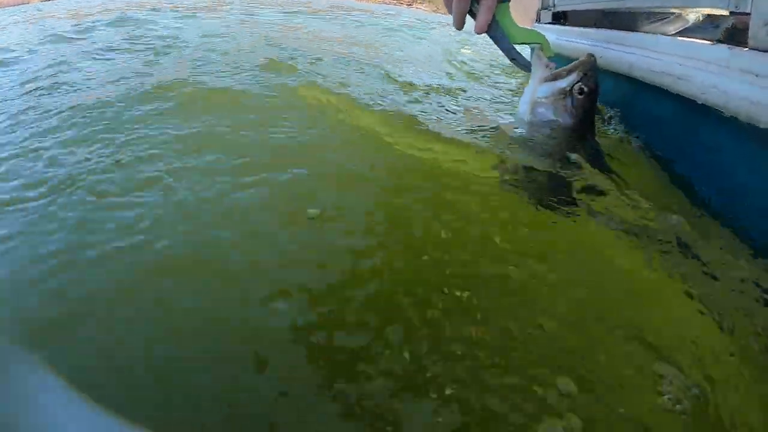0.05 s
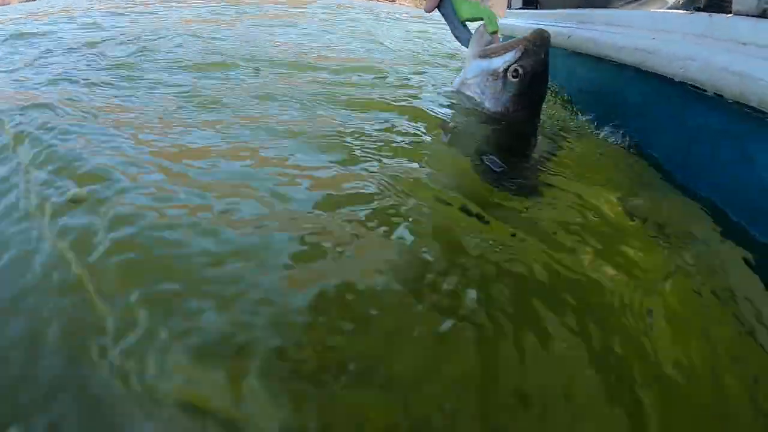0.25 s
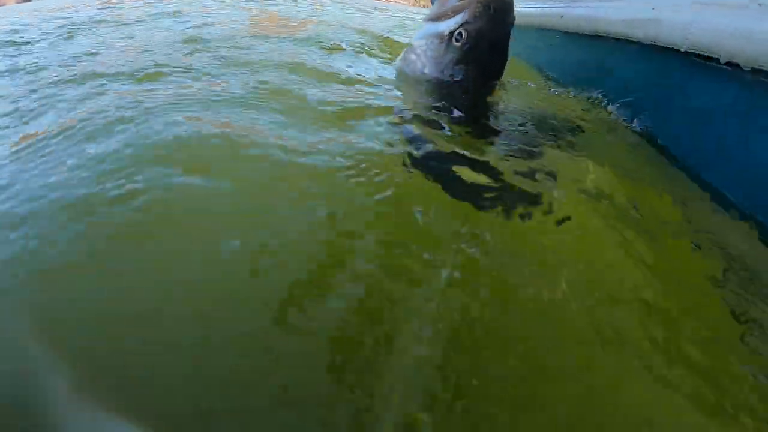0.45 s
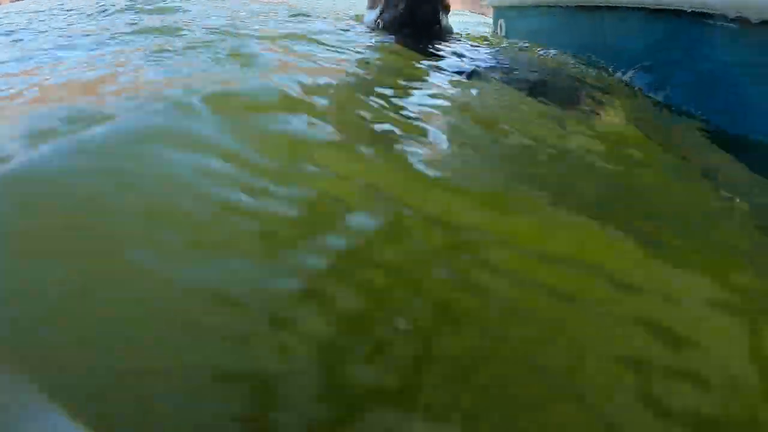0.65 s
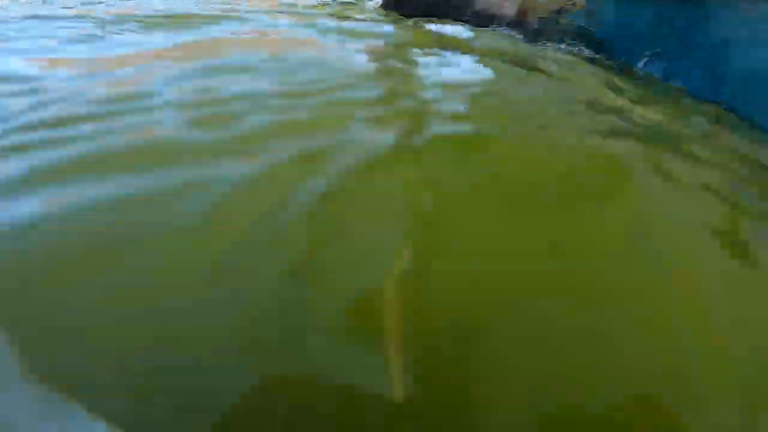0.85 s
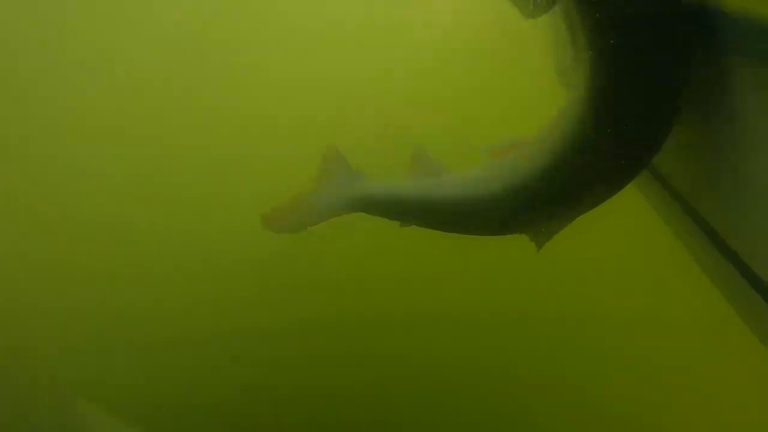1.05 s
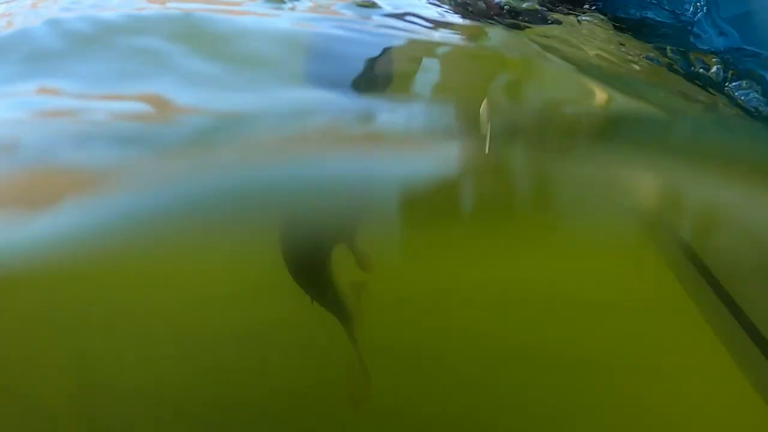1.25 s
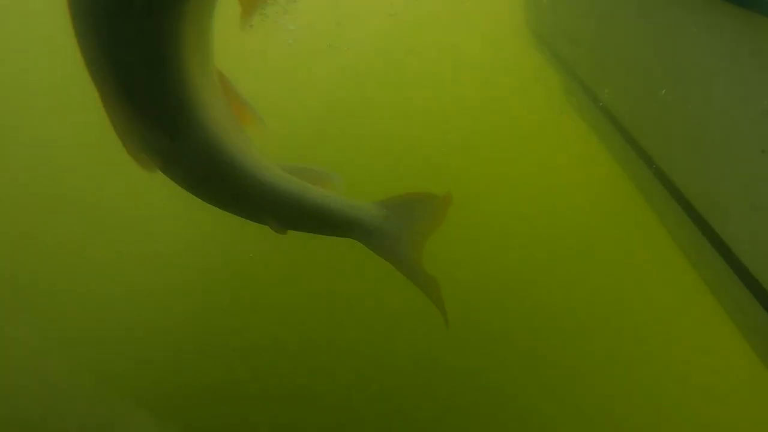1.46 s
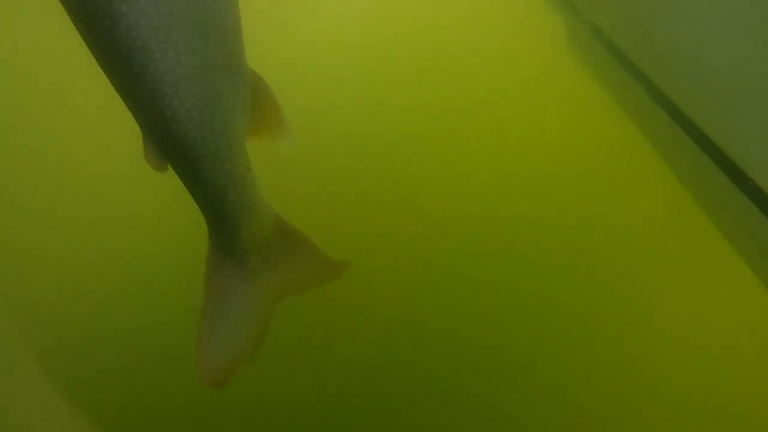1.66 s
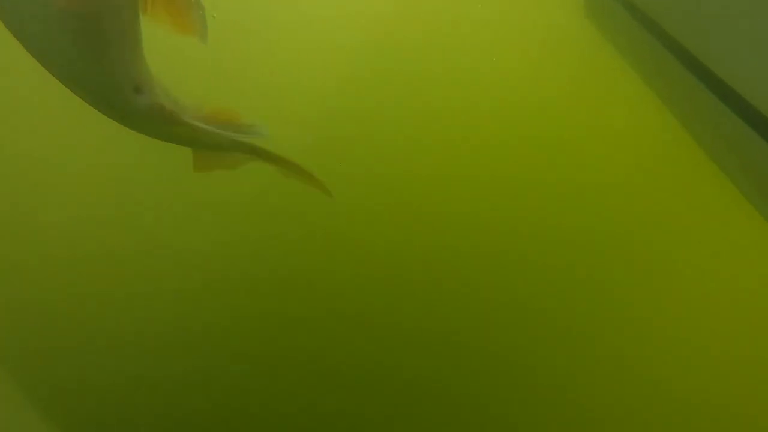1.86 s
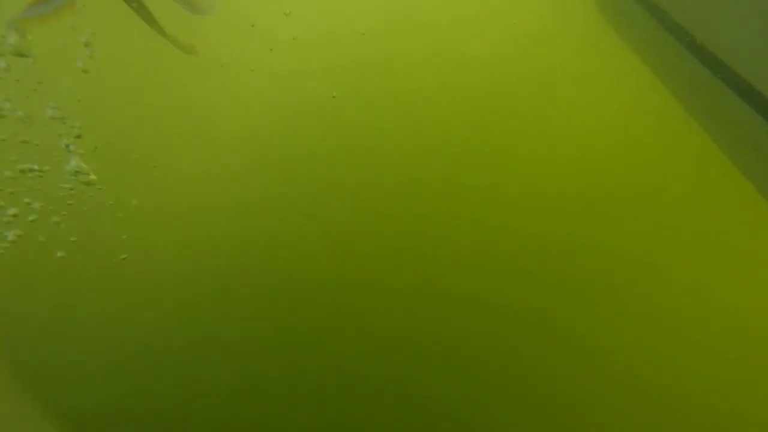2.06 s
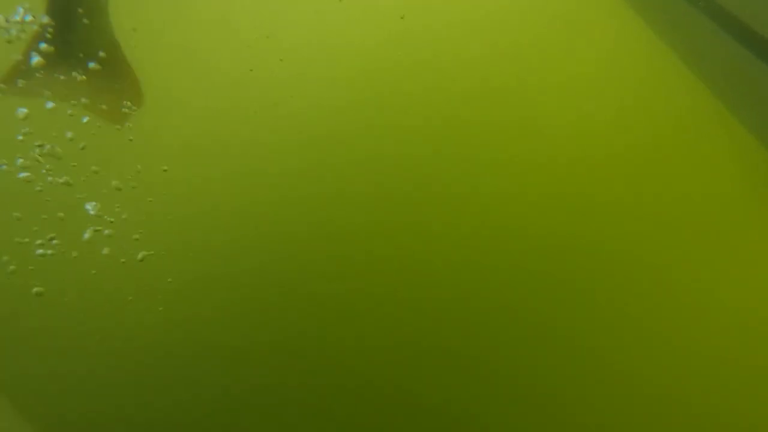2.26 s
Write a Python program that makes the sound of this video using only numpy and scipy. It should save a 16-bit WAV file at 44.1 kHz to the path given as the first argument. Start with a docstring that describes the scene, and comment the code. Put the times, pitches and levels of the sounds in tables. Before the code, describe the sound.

Water laps lightly beside a boat, with crisp drips and a sharp little splash in open air; then the microphone goes under with a plop, and everything turns to muffled rumble, thickening bubbles and gurgles.

```python
"""Stereo microphones in a housing at the waterline beside a boat hear open air, lapping, drops and a splash.
Air hiss and rumble are coloured noise, drops are short dying sines with a snap, and spray is a dense rain of clicks.
At 0.88 s the water closes over the ports: tiny bubbles fizz, a plop sounds and the air sounds stop.
Then follows a muffled churn of crowded bubbles, with single plops, gurgles, ticks of the housing and deep rumble."""
import sys
import numpy as np
from scipy import signal
from scipy.fft import rfft, irfft
from scipy.io import wavfile

SR = 44100
rng = np.random.default_rng(int(sys.argv[2]) if len(sys.argv) > 2 else 0)


def unload_wav(signal):
    """Save mono or channel-first audio to the path in sys.argv[1] as 16-bit WAV at rate SR, clipped to [-1, 1]."""
    wavfile.write(
        sys.argv[1],
        SR,
        np.round(np.clip(np.atleast_2d(signal).T, -1, 1) * 32767).astype(np.int16),
    )


def rack_gain(trim_db):
    """Turn a fader trim in dB into the linear factor to multiply a signal by."""
    fader = np.asarray(trim_db, float)
    return 10 ** (fader / 20)


N = 101959   # samples in the scene
FLOODED_ALIKE = 0.05   # correlation between the channels under water


def rms_one(x):
    """Normalisation of mean power: scale to rms 1."""
    return x / np.sqrt(np.mean(x ** 2) + 1e-20)


def in_time(rows):
    """Linear interpolation in time: each column of a curve at every sample."""
    s, *columns = np.transpose(rows)
    return [np.interp(np.arange(N) / SR, s, column) for column in columns]


def panned(pan_db):
    """Intensity stereo: gains of left and right that differ by pan_db, left over right."""
    return rack_gain(np.multiply.outer([0.5, -0.5], np.asarray(pan_db) + np.zeros(1)))


def at_hz(points, hz):
    """Spectral envelope: interpolate levels in dB on a logarithmic frequency axis."""
    point_hz, point_db = np.array(points).T
    return np.interp(np.log(hz + 1), np.log(point_hz), point_db)


def drift(rate_hz):
    """Random modulation: white noise through a double-pole low-pass, rms 1, made at SR / 40."""
    pole = np.exp(-2 * np.pi * rate_hz * 40 / SR)
    white = rng.standard_normal(N // 40 + 2002)
    slow = signal.lfilter([1], [1, -2 * pole, pole ** 2], white)[2000:]   # past the filter's start
    return np.interp(np.arange(N) / 40, np.arange(len(slow)), rms_one(slow))


def coloured(x, spectrum):
    """Filtering as spectral multiplication: shape a flat signal, then set rms 1."""
    hz = np.arange(N // 2 + 1) * SR / N
    return rms_one(irfft(rfft(x) * rack_gain(at_hz(spectrum, hz)), N))


def correlated(mid, side, alike):
    """Interchannel correlation: left and right from two independent signals, with correlation alike."""
    return np.sqrt(1 + alike) * mid + np.sqrt(1 - alike) * side * [[1], [-1]]


def noise(alike):
    """Diffuse field: stereo white noise with a set interchannel correlation."""
    mid, side = rng.standard_normal((2, N))
    return correlated(mid, side, alike)


def grains(per_s, cycles, pitches, spread_db):
    """Shot noise in resonators: random clicks, each ringing down 60 dB in some cycles, equal power per Hz."""
    sizes = rack_gain(spread_db * np.minimum(rng.exponential(1, N), 4)) * rng.choice([-1, 1], N)
    born = rng.random(N) < per_s / SR
    dealt = rng.integers(0, len(pitches), N)
    out = 0
    for k, hz in enumerate(pitches):
        radius = rack_gain(-60 * hz / (cycles * SR))
        angle = 2 * np.pi * hz / SR
        clicks = sizes * born * (dealt == k) + 1e-18   # never quite zero
        feedback = [1, -2 * radius * np.cos(angle), radius ** 2]
        out = out + hz * signal.lfilter([0, np.sin(angle)], feedback, clicks)
    return rms_one(out)


def add(out, s, sound, pan_db):
    """Superposition: mix a sound in at a time."""
    i = int(s * SR)
    out[:, i:i + len(sound)] += panned(pan_db) * sound[:N - i]


def bubble(hz, db, t60, rise, attack_s):
    """Damped oscillator: a sine swells in, decays 60 dB in t60 and rises by the share rise per second."""
    t = np.arange(int(2 * SR * max(t60, 0.002))) / SR
    decay = rack_gain(db - 60 * t / t60)
    swell = 1 - np.exp(-(t / attack_s) ** 2)
    return decay * swell * np.sin(2 * np.pi * hz * (t + rise * t * t / 2))


def above():
    """Gating by immersion: 1 while the ports are in air, 0 once they are flooded."""
    flooded_s, close_s = 0.883, 0.001
    return np.clip((flooded_s - np.arange(N) / SR) / close_s, 0, 1)


def air_hiss():
    """Broadband ambience: white noise and dense ringing grains share one spectrum and a drifting level."""
    # Treble hiss of the open air. Each row: time in seconds, central level in dB.
    hiss_levels = [(0.0, -48), (0.728, -46.5), (0.85, -49.5), (0.885, -46)]
    # Balance of the hiss. Each row: time in seconds, left-right difference in dB.
    hiss_balance = [(0, -1), (.78, 1.5), (.84, 2.5), (.885, -23.5)]
    # Spectrum of the hiss. Each row: frequency in Hz, relative density in dB per Hz.
    hiss_spectrum = [(180, 0), (300, 3.5), (450, -25.5), (890, -12), (1200, -5), (1550, -10), (2800, -12.5),
                     (4500, -19.5), (7500, -25), (9000, -35), (12000, -40.5), (15500, -48.5), (20000, -70)]
    (level_db,), (pan_db,) = in_time(hiss_levels), in_time(hiss_balance)
    ringing = grains(350, 9.6, np.geomspace(800, 14000, num=14), 1.8)
    flat = noise(0.22) + rack_gain(-9.5) * ringing
    return rack_gain(level_db + 1.0 * drift(31)) * panned(pan_db) * coloured(flat, hiss_spectrum)


def rumble():
    """Low-frequency pressure fluctuation: water pushes on the housing, heard as coloured noise."""
    # Push of the water in air. Each row: time in seconds, central level in dB.
    air_levels = [(0.0, -24.5), (0.094, -40), (0.372, -46), (0.392, -40), (0.516, -44.5), (0.9, -30.5)]
    # Spectrum of that push. Each row: frequency in Hz, relative density in dB per Hz.
    air_spectrum = [(10, -1.5), (22, -6.5), (45, 1), (90, -2.5), (133, -5.5), (200, -12.5), (400, -46.5),
                    (1200, -130)]
    # The same under water. Each row: time in seconds, level in dB before a lift of 3 dB.
    deep_levels = [(0.9, -26), (0.946, -57), (0.986, -57), (1.056, -27), (1.088, -37), (1.146, -25),
                   (1.366, -37), (1.496, -22), (1.524, -29), (1.76, -26), (2.262, -27), (2.31, -22)]
    # Spectrum under water. Each row: frequency in Hz, relative density in dB per Hz.
    deep_spectrum = [(10, -14), (22, 0), (45, 0), (90, -4), (125, -8), (180, -30), (400, -70), (1200, -130)]
    # Balance of the rumble. Each row: time in seconds, left-right difference in dB.
    rumble_balance = [(0, 3.5), (.55, 8), (.75, 1), (.85, -8), (.99, -32.5), (1.03, -8.5), (1.1, -3),
                      (1.3, 2.5), (2.31, 5)]
    (air_db,), (deep_db,), (pan_db,) = in_time(air_levels), in_time(deep_levels), in_time(rumble_balance)
    wet = np.clip((np.arange(N) / SR - deep_levels[0][0]) / 0.022, 0, 1)   # crossfade over 22 ms
    air = rack_gain(air_db + 2.5 * drift(30)) * (1 - wet) * coloured(noise(0.54), air_spectrum)
    deep = rack_gain(deep_db + 3) * wet * coloured(noise(FLOODED_ALIKE), deep_spectrum)
    return panned(pan_db) * (air + deep)


def crowd(per_s):
    """Superposed damped oscillators: random bubbles glide up 18 percent over t60, equal power per Hz."""
    out = np.zeros((2, N))
    for when, pitch, size, life in rng.random((2000, 4))[:int(per_s * N / SR)]:
        hz = 300 + 1380 * pitch
        cycles = 24.6 * (1.2 + 2.41 * life)   # to fall 60 dB
        t60 = cycles / hz
        db = -3.5 * np.log(size + 0.08) + 10 * np.log10(hz / cycles)
        add(out, when * N / SR, bubble(hz, db, t60, 0.18 / t60, 0.84 / hz), 0)
    return rms_one(out[0])


def churn():
    """Bubble cloud: crowds of oscillators on noise, as lapping above and as churn through the flooded housing."""
    # Lapping above and churn below the surface. Each row: time in seconds, central level below 900 Hz
    # in dB, central level above 900 Hz in dB.
    churn_levels = [(0, -54, -41.5), (.1, -50.5, -60.5), (.32, -50, -91), (.45, -44.5, -67),
                    (.6, -48.5, -59.5), (.73, -44, -50), (.82, -57, -57.5), (.875, -27, -40.5),
                    (.91, -49.5, -93), (.95, -61, -60), (1.03, -42.5, -71), (1.07, -38.5, -47),
                    (1.11, -31.5, -50), (1.22, -27, -56.5), (1.28, -33, -57), (1.33, -43.5, -41),
                    (1.39, -37.5, -47.5), (1.45, -31, -37.5), (1.6, -30, -40), (1.68, -25, -37.5),
                    (1.73, -24.5, -49.5), (1.85, -21.5, -39), (1.95, -28.5, -27.5), (2.01, -26, -36.5),
                    (2.1, -21, -38.5), (2.17, -21, -35), (2.21, -23.5, -36), (2.25, -21, -34.5),
                    (2.31, -31, -40)]
    # Spectrum of the churn. Each row: frequency in Hz, relative density in dB per Hz.
    churn_spectrum = [(76, -37.5), (130, 7), (167, 1), (278, -2.5), (426, -3.5), (891, -8), (1070, -14.5),
                      (1320, -14), (1510, -14.5), (1800, -56), (2340, -89), (3960, -120)]
    # The left port dips first and clears later. Each row: time in seconds, left-right dB below 900 Hz.
    churn_balance = [(0, 1.5), (.8, 1.5), (.85, -18.5), (.99, -30), (1.03, -0.5), (1.09, -9.5), (1.13, 2),
                     (1.3, -13), (1.36, 2), (2.31, 1)]
    left_dips_s = 0.83
    (low_db, high_db), (pan_db,) = in_time(churn_levels), in_time(churn_balance)
    bubbles_per_s = 260
    crowds = np.array([crowd(bubbles_per_s), crowd(bubbles_per_s)])
    shared, apart = coloured(crowds + rack_gain(11) * rng.standard_normal((2, N)), churn_spectrum)
    alike = np.where(np.arange(N) < left_dips_s * SR, 0.94, FLOODED_ALIKE)
    mix = correlated(shared, apart, alike)
    low = signal.sosfiltfilt(signal.butter(2, 900, fs=SR, output="sos"), mix)
    high = mix - low
    low_part = rack_gain(low_db + 2.0 * drift(21)) * panned(pan_db) * rms_one(low)
    return low_part + rack_gain(high_db + 2.0 * drift(15)) * rms_one(high)


def trickle():
    """Sparse shot noise: droplets tick left and right through resonators and a low-pass."""
    pitches = np.geomspace(1800, 7500, num=14)
    middle, left, right = [grains(160, 12, pitches, 3) for k in range(3)]
    dull = signal.butter(4, 7000, fs=SR, output="sos")
    return rack_gain(-64.5) * signal.sosfilt(dull, middle + np.array([left, right]))


def gurgles():
    """Frequency modulation: large air pockets sound as long sines of gliding, trembling pitch."""
    # Gurgles of large air pockets, the first, at the hull and in the deep. Each row of the three:
    # time in seconds, central frequency in Hz, central level in dB.
    first_gurgle = [(0.0, 831, -37), (0.035, 1276, -45), (0.05, 1890, -50)]
    hull_gurgle = [(0.664, 188, -36), (0.668, 203, -25), (0.705, 183.5, -33), (0.781, 206, -39.5)]
    deep_gurgle = [(1.761, 274.5, -19.5), (1.8, 313.5, -22.5), (1.824, 336.5, -23.5), (1.845, 354.7, -16),
                   (1.88, 342, -20)]
    # Place of each gurgle: left-right difference in dB.
    gurgle_pans = [-1, -3.5, -3.5]
    out = np.zeros((2, N))
    t = np.arange(N) / SR
    for rows, pan_db in zip([first_gurgle, hull_gurgle, deep_gurgle], gurgle_pans):
        hz, db = in_time(rows)
        edge = np.clip(np.minimum(t - rows[0][0], rows[-1][0] - t) / 0.0016, 0, 1)   # ramps of 1.6 ms
        phase = 2 * np.pi * np.cumsum(hz * (1 + 0.045 * drift(50))) / SR
        tone = np.sqrt(2) * np.sin(phase)   # rms 1
        out += panned(pan_db) * edge * rack_gain(db + 2.5 * drift(50)) * tone
    return out


def drops():
    """Impact and resonance: each drop is a dying sine of rising pitch with a short noise snap."""
    # Drops and small bubbles at the surface. Each row: start in seconds, level in dB before decay and
    # swell, initial frequency in Hz, left-right difference in dB, t60 in seconds.
    drop_list = [(0.0706, -42.5, 4770, -1, 0.0056), (0.0771, -31, 5400, 0, 0.0026),
                 (0.327, -38, 2670, -1, 0.017), (0.3838, -35, 3640, 0.5, 0.014),
                 (0.4044, -14.5, 7140, -4, 0.0043), (0.411, -33.5, 3280, 6.5, 0.011),
                 (0.4365, -16, 3180, 6, 0.003), (0.4426, -26.5, 3340, -2.5, 0.029),
                 (0.4467, -23, 3820, 5.5, 0.0096), (0.459, -30.5, 4060, 5.5, 0.011),
                 (0.4888, -41.5, 3380, 10, 0.01), (0.5082, -33, 4900, 0.5, 0.006),
                 (0.526, -30.5, 3980, -3, 0.0032), (0.5936, -46.5, 4800, 1, 0.0052),
                 (0.6097, -31.5, 5080, 0.5, 0.0093), (0.64, -39.5, 7400, -5, 0.0042),
                 (0.608, -28, 3430, 7.5, 0.027), (0.628, -32.5, 4280, 6, 0.0062),
                 (0.6403, -34.5, 2630, 5, 0.023), (0.66, -36, 3720, 6.5, 0.019),
                 (0.752, -46, 7040, -2.5, 0.0077), (0.839, -28.5, 1720, -10.5, 0.022),
                 (0.8653, -28, 5410, -19.5, 0.014)]
    rise_per_s, snap_db = 11, -19   # share of the pitch; snap relative to the drop
    out = np.zeros((2, N))
    snaps = rng.standard_normal((len(drop_list), 60)) * np.exp(-np.arange(60) / 28.0)
    for (s, db, hz, pan_db, t60), snap in zip(drop_list, snaps):
        add(out, s, bubble(hz, db, t60, rise_per_s, 0.000089), pan_db)
        filtered = np.convolve(snap, [0.59, 0.5, 0, -0.5, -0.36])   # weakens the lows
        add(out, s, rack_gain(db + snap_db) * filtered, pan_db)
    return out


def plops():
    """Bubble resonance: single damped sines rise 2.5 percent in pitch over t60."""
    # Single bubbles and plops. Each row: start in seconds, level in dB before decay and swell,
    # initial frequency in Hz, t60 in seconds, left-right difference in dB.
    plop_list = [(0.325, -30, 1094, 0.034, -3), (.858, -18.5, 139.6, 0.08, -29),
                 (0.87, -21.5, 353.4, 0.082, -22), (0.88, -3.5, 551, 0.01, -29),
                 (0.879, -16, 1338, 0.0032, -23), (0.4, -20, 45, 0.094, 7.5),
                 (0.893, -25.5, 561, 0.039, -39), (1.01, -40.5, 1585, 0.015, 13),
                 (1.0523, -12.5, 842, 0.019, 4), (1.0527, -9.5, 110, 0.014, 14),
                 (1.051, -26.5, 1450, 0.0089, 7), (1.146, -9, 296, 0.026, -18),
                 (1.153, -41, 3365, 0.054, 13.5), (1.162, -24.5, 3063, 0.029, 7.5),
                 (1.255, -27, 566.6, 0.16, -18), (1.33, -20, 900, 0.013, 9),
                 (1.351, -27.5, 967, 0.094, 2.5), (1.376, -31.5, 1515, 0.033, 5.5),
                 (1.666, -14, 704, 0.039, -8), (1.6806, -7.5, 1408, 0.028, 11.5),
                 (1.691, -2.5, 201, 0.016, 9), (1.758, -12, 585, 0.041, -11.5),
                 (1.7653, -8.5, 1355, 0.027, -8), (1.7865, -14.5, 610, 0.038, -0.5),
                 (1.866, -17, 1297, 0.029, 2.5), (1.929, -14.5, 348, 0.15, 6.5),
                 (1.951, -24, 1503, 0.043, 8.5), (1.965, -13, 767, 0.06, -5), (2.021, -22, 471.6, 0.31, -9),
                 (2.064, -20.5, 476.3, 0.34, -10), (2.083, -15.5, 568, 0.095, 8.5),
                 (2.113, -16, 1333, 0.033, 18.5), (2.123, -10, 389, 0.065, 6), (2.137, -14.5, 558, 0.14, 5),
                 (2.165, -25.5, 606, 0.21, 12), (2.101, -7.5, 180, 0.068, 3), (2.193, -20, 939, 0.065, 20),
                 (2.196, -16.5, 1360, 0.029, 0), (2.221, -15, 579, 0.1, 2), (2.262, -6, 1092, 0.027, 6)]
    out = np.zeros((2, N))
    for s, db, hz, t60, pan_db in plop_list:
        attack_s = min(0.073 * t60, 0.0044)
        add(out, s, bubble(hz, db, t60, 0.025 / t60, attack_s), pan_db)
    return out


def spray():
    """Dense shot noise: clicks ring briefly, largely apart in left and right, over a bed of noise."""
    # Spray of the splashes. Each row: time in seconds, level in dB before a cut of 9 dB,
    # left-right difference in dB.
    spray_levels = [(0.37, -53, -4), (0.408, -38.5, -9.5), (0.42, -41.5, 1.5), (0.446, -16, -1.5),
                    (0.472, -42.5, -4), (0.574, -60.5, -2.5), (0.602, -68.5, -11), (0.606, -32.5, -0.5),
                    (0.684, -63, -7), (0.794, -47.5, -7.5), (0.87, -31.5, -12), (0.885, -64.5, -13)]
    # Spectrum of the spray. Each row: frequency in Hz, relative density in dB per Hz.
    spray_spectrum = [(300, -4.5), (900, -11), (1160, -8), (2050, -11), (3700, -4.5), (5100, -7),
                      (6300, -8.5), (8000, -16.5), (9500, -23.5), (12000, -36), (15500, -33.5),
                      (20000, -44.5)]
    level_db, pan_db = in_time(spray_levels)
    pitches = np.geomspace(1000, 15000, num=16)
    shared, left, right = [grains(1500, 3.5, pitches, 4.2) for k in range(3)]
    flat = shared + rack_gain(8.0) * np.array([left, right]) + rack_gain(-4) * noise(0.51)
    begun = np.arange(N) > spray_levels[0][0] * SR
    return rack_gain(level_db - 9) * begun * panned(pan_db) * coloured(flat, spray_spectrum)


def fizz():
    """Many small resonators: tiny bubbles, scattered round a sinking pitch, as water climbs over the ports."""
    # Course of the fizz. Each row: time in seconds, central frequency in Hz, central level in dB
    # before decay and swell.
    fizz_course = [(.83, 6920, -42), (.855, 5740, -36.5), (.883, 5320, -43.5)]
    per_s, spread, t60_s, pan_db = 1500, 0.026, 0.005, -17.5   # spread as a share of the pitch
    out = np.zeros((2, N))
    s, centre_hz, centre_db = np.transpose(fizz_course)
    span_s = s[-1] - s[0]
    chance = np.c_[rng.random(200), rng.standard_normal((200, 2))][:int(per_s * span_s)]
    for when, pitch, size in chance:
        at = s[0] + when * span_s
        hz = np.interp(at, s, centre_hz) * (1 + spread * pitch)
        db = np.interp(at, s, centre_db) + 3.1 * size
        add(out, at, bubble(hz, db, t60_s, 0, 0.00063), pan_db)
    return out


def seep():
    """Residual transmission: faint treble under water, from ringing grains and noise."""
    # Faint treble under water. Each row: time in seconds, central level in dB.
    seep_levels = [(.89, -78), (1.02, -72), (1.1, -67), (1.18, -57.5), (1.3, -70.5), (1.39, -69.5),
                   (1.44, -60.5), (1.7, -61.5), (1.8, -68.5), (1.95, -56), (2.06, -65.5), (2.29, -72.5)]
    # Spectrum of that treble. Each row: frequency in Hz, relative density in dB per Hz.
    seep_spectrum = [(1200, -40.5), (1700, -9), (2000, -10), (2500, -8), (2950, -9.5), (3150, -6.5),
                     (3350, -12.5), (3600, -20), (3900, -25.5), (5000, -28), (6500, -50.5), (9000, -90),
                     (20000, -120)]
    level_db, = in_time(seep_levels)
    ringing = grains(350, 35.0, np.geomspace(1800, 6500, num=14), 0.49)
    flat = ringing + rack_gain(7.0) * noise(FLOODED_ALIKE)
    return rack_gain(level_db + 1.8 * drift(25)) * (1 - above()) * coloured(flat, seep_spectrum)


def ticks():
    """Modal excitation: each tick rings the housing modes in strengths of its own, with a ragged tail."""
    # Bubbles tick against the flooded housing. Each row: start in seconds, reference level in dB,
    # extra level of the modes above 4 kHz in dB.
    tick_list = [(1.036, -47, -1), (1.0525, -44, 17), (1.0985, -58, 19), (1.164, -38.5, 4),
                 (1.3763, -48, -6), (1.4267, -39.5, 20), (1.6672, -27, 10), (1.6915, -19, -20),
                 (1.7509, -37.5, 0), (1.831, -36.5, -5), (2.1156, -48, -19), (2.213, -45.5, -0.5),
                 (2.2625, -54, -9)]
    # Modes of the housing. Each row: frequency in Hz, central relative level in dB, t60 in seconds.
    housing_modes = [(2063, -7.5, 0.024), (2630, -8.5, 0.016), (3040, -10, 0.026), (3600, -20.5, 0.0083),
                     (4700, -23, 0.0047), (5900, -19.5, 0.0031)]
    out = np.zeros((2, N))
    chances = rng.standard_normal((len(tick_list), len(housing_modes)))
    for (s, db, bright_db), chance in zip(tick_list, chances):
        for (hz, mode_db, t60), luck in zip(housing_modes, chance):
            level_db = db + mode_db + bright_db * (hz > 4000) + 2.5 * luck
            add(out, s, bubble(hz, level_db, t60, 0, 0.001), 0)
    return out * (1 + 0.4 * drift(250))


def scene():
    """Linear superposition: sources at the surface, cut off by the dive, and sources heard through water."""
    surface = (air_hiss() + trickle() + drops() + spray() + fizz()) * above()
    return surface + rumble() + churn() + gurgles() + plops() + seep() + ticks()


def roll_off(x):
    """The treble ends steeply here."""
    return signal.sosfilt(signal.butter(12, 15830, fs=SR, output="sos"), x)


def record(dry):
    """Mid-side stereo and saturation: the side fades under water, then peaks clip."""
    # Under water the stereo picture folds to mono. Each row: time in seconds, gain of the side in dB.
    width = [(0, 0), (1.08, 0), (1.15, -4), (1.35, -6), (1.45, -9), (1.55, -15), (1.7, -23), (1.9, -30),
             (2.1, -42), (2.31, -45)]
    side_db, = in_time(width)
    mid = (dry[0] + dry[1]) / 2
    side = (dry[0] - dry[1]) / 2 * rack_gain(side_db)
    mix = np.clip([mid + side, mid - side], -1, 1)
    return roll_off(mix)


dry = scene()
out = record(dry)
unload_wav(out)
```